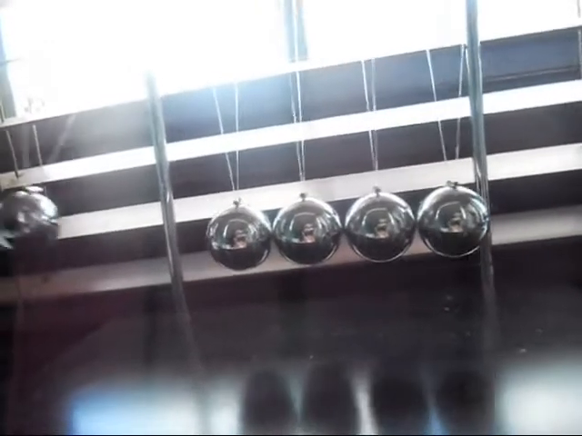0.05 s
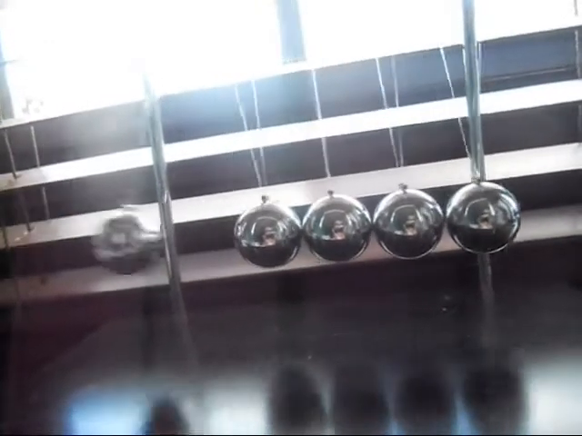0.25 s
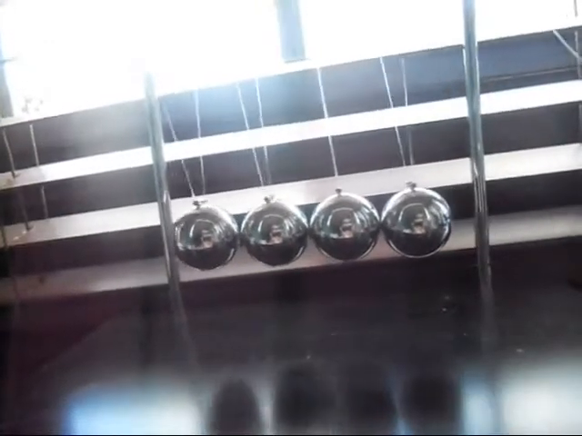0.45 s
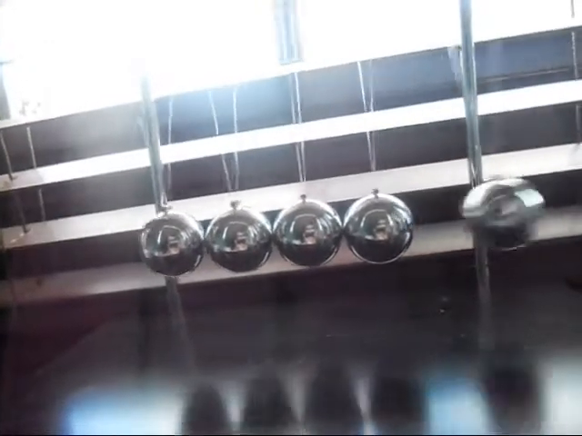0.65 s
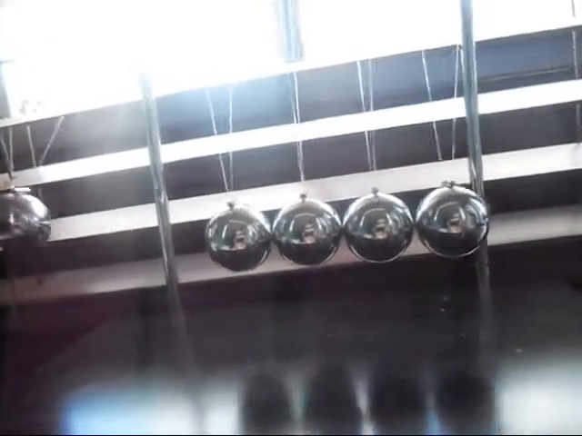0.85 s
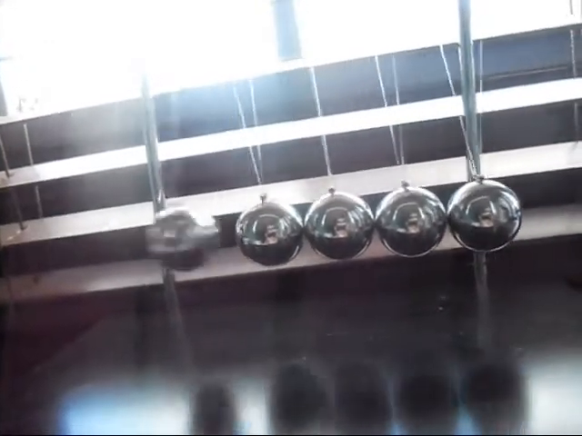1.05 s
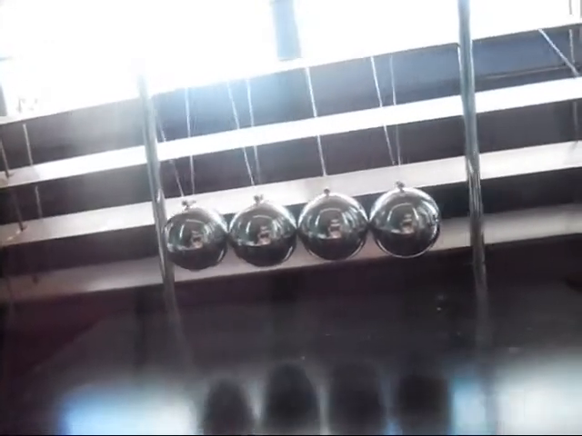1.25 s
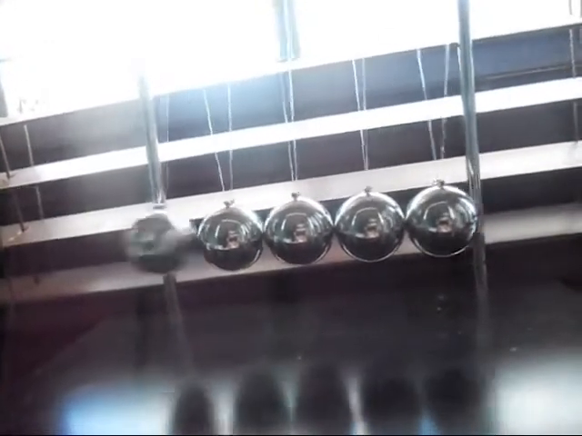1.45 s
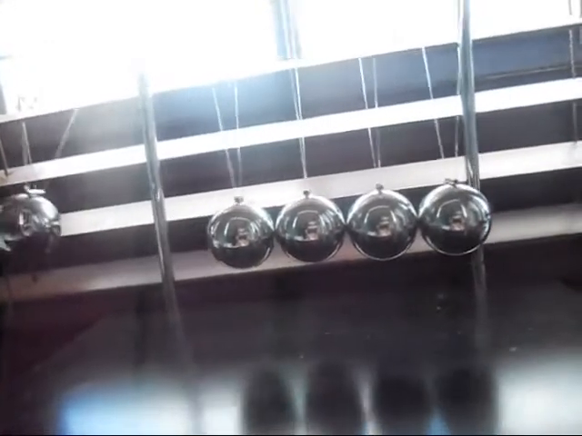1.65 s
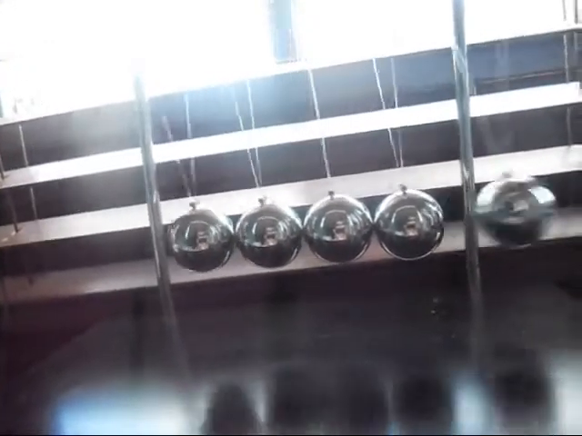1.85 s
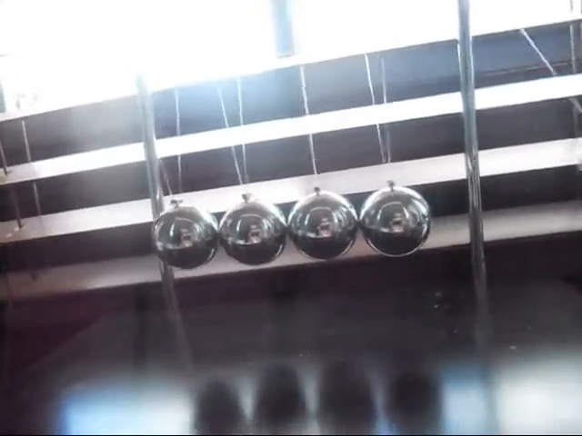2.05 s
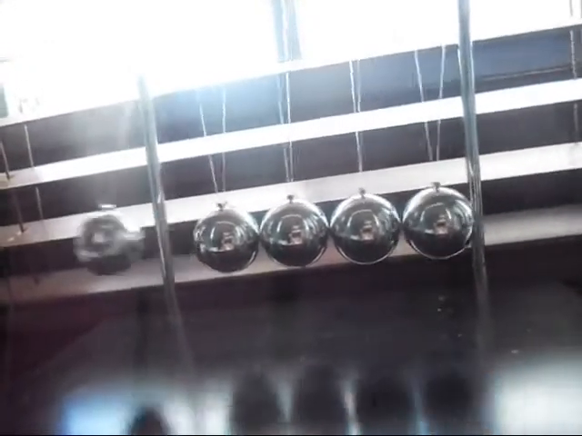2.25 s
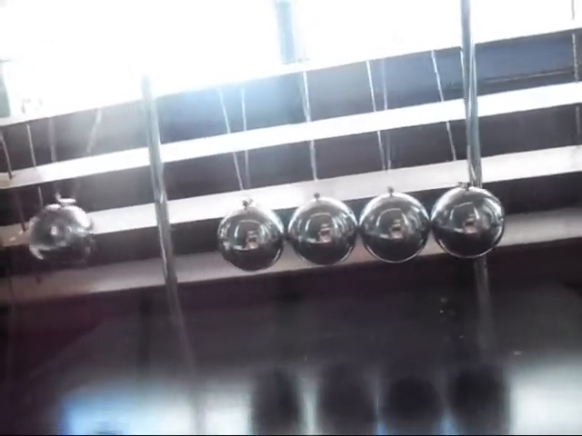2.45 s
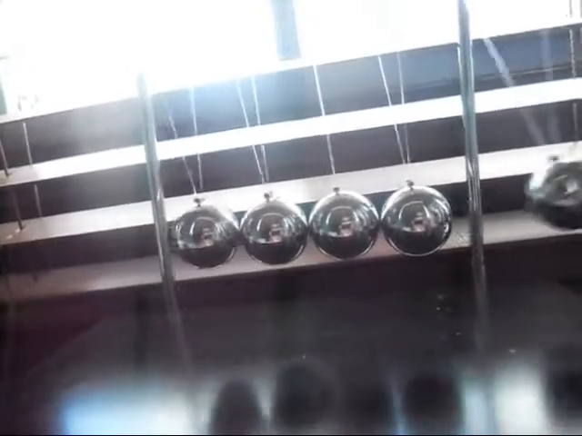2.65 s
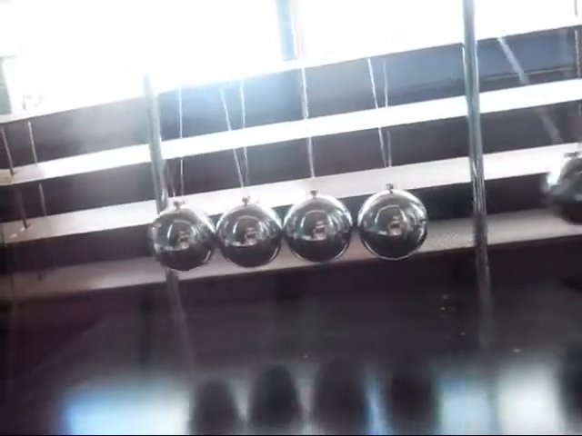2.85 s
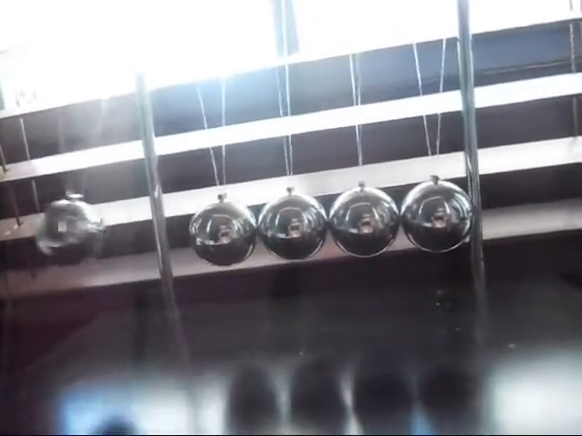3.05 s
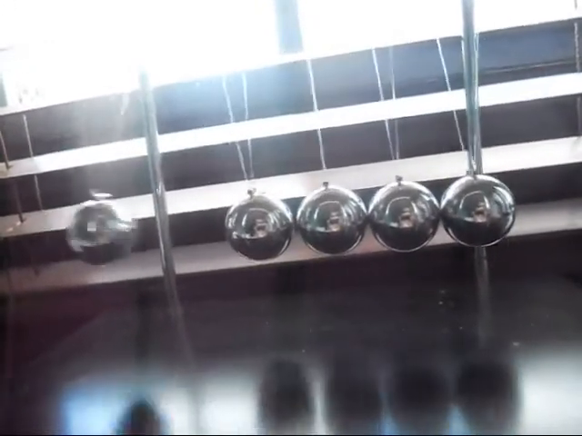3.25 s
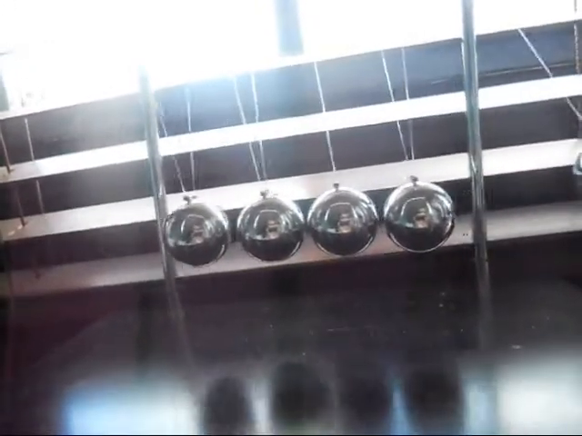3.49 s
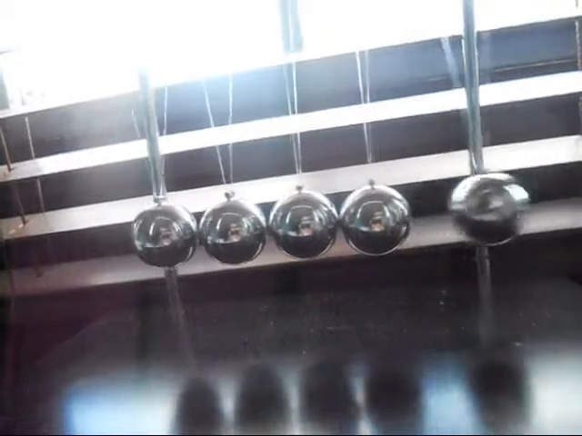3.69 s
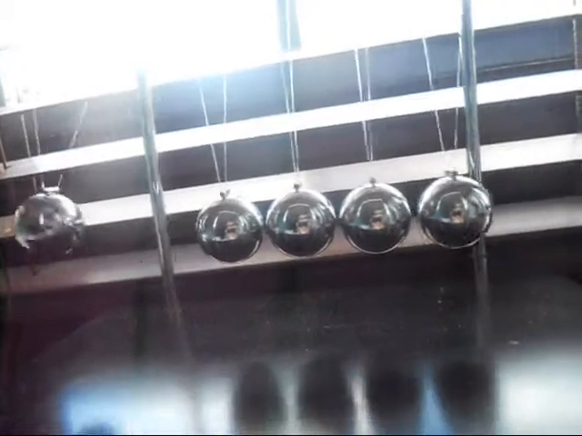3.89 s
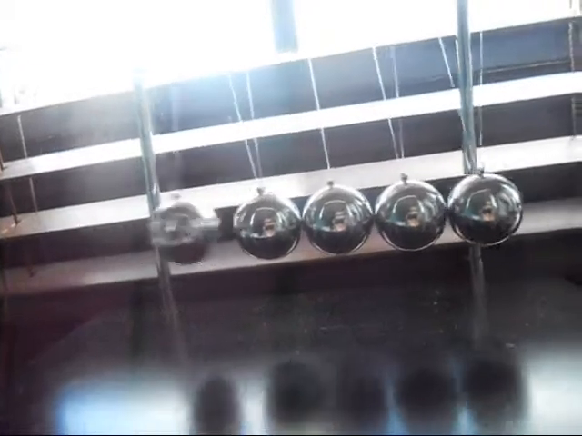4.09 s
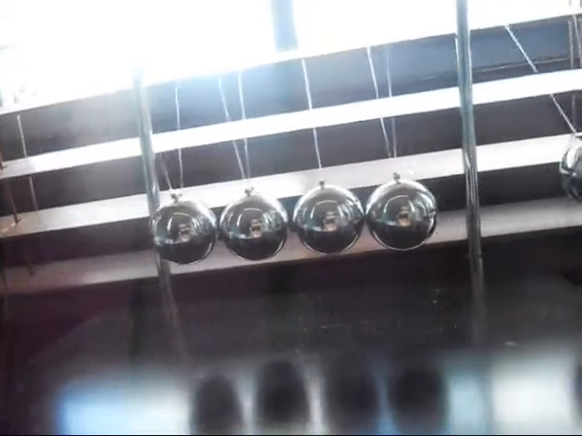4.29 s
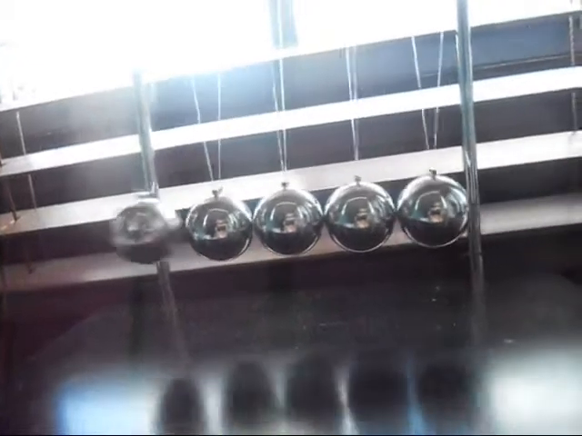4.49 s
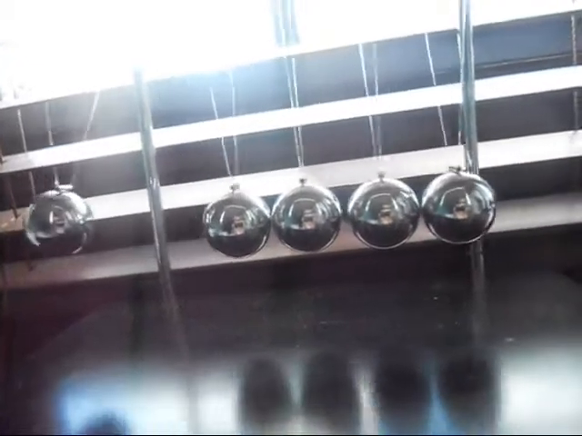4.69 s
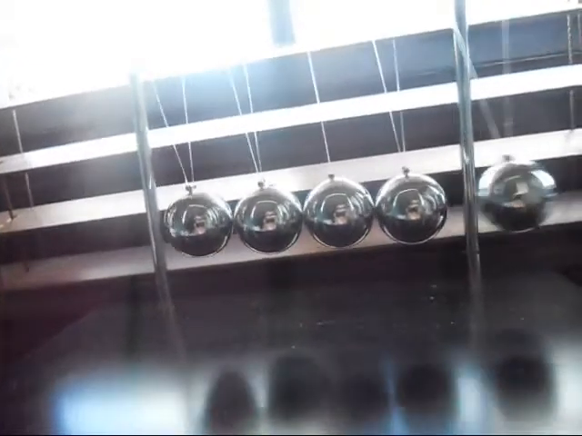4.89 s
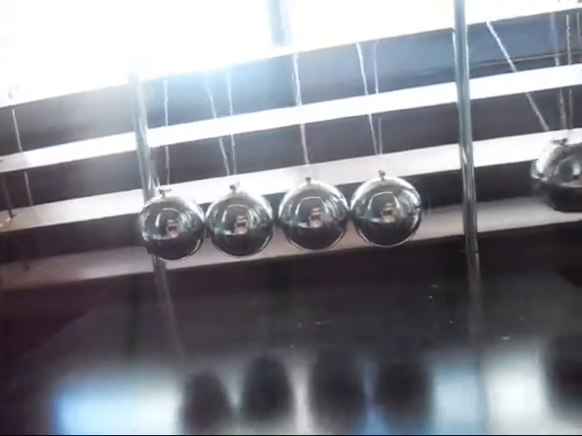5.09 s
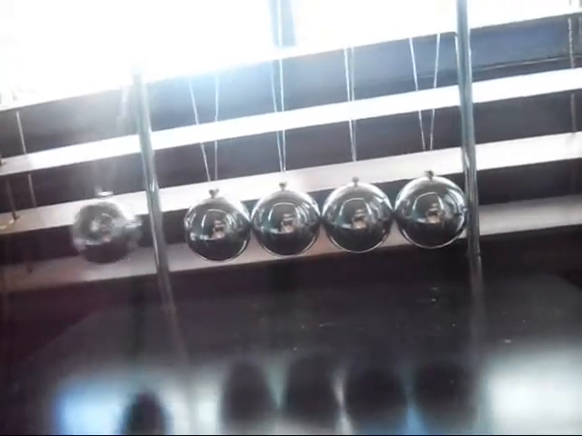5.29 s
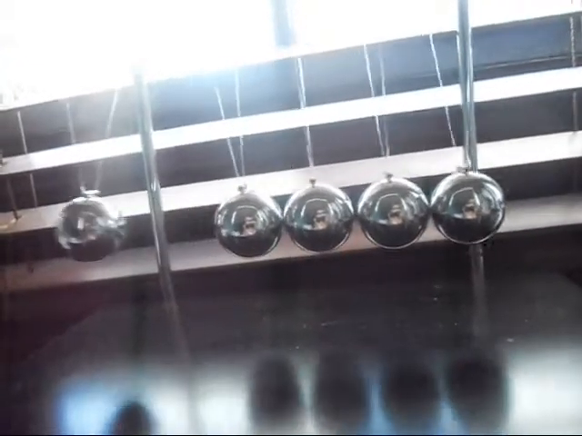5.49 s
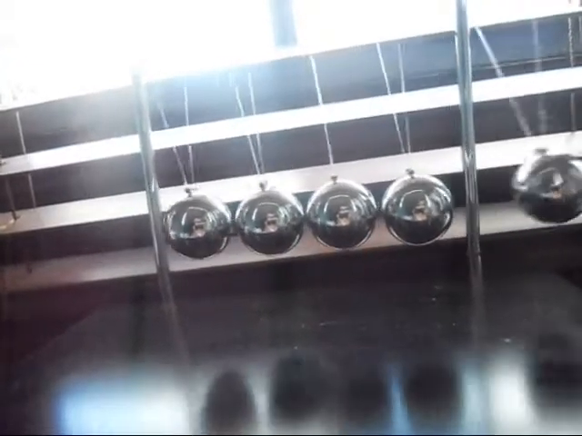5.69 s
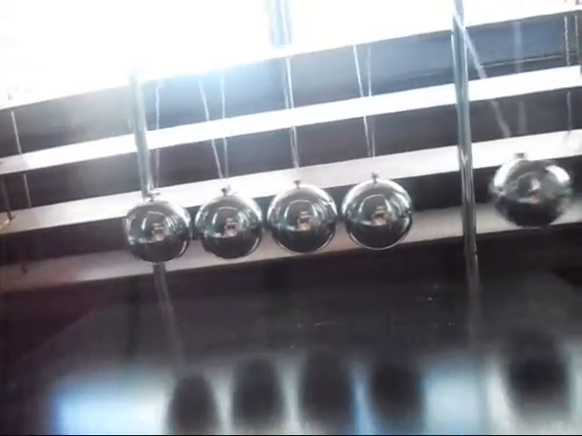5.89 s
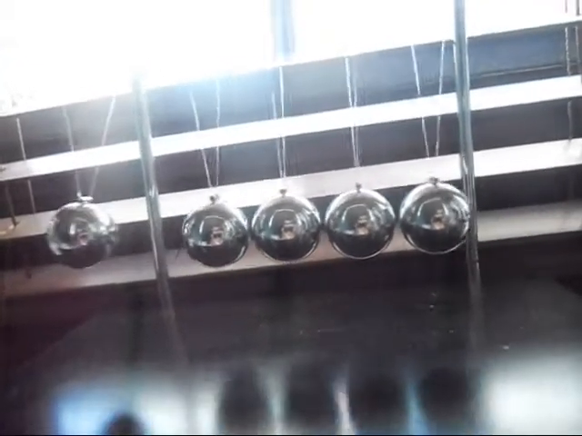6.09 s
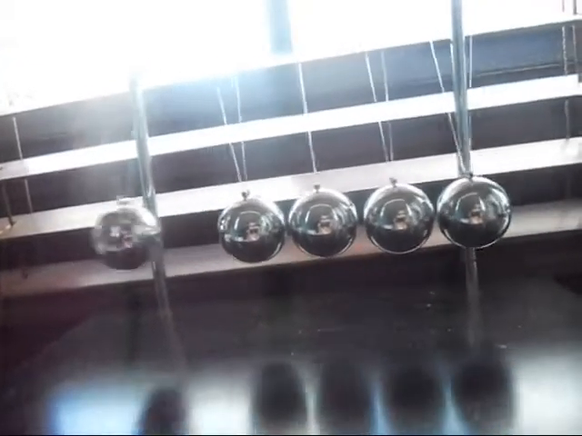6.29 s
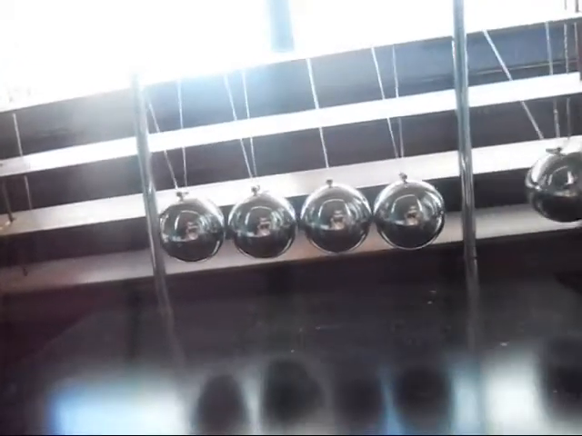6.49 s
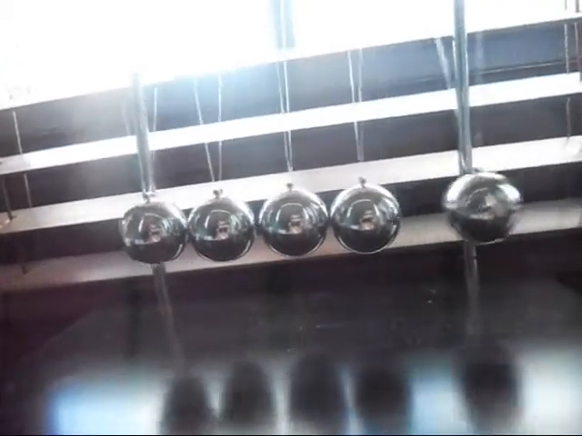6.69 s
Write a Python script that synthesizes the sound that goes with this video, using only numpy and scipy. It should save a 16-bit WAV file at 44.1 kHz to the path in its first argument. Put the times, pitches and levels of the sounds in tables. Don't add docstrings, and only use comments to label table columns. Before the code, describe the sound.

Five hanging steel balls clack sharply back and forth about every 0.38 seconds, close up, over rumbling hiss that suddenly drops near two seconds.

```python
import sys
import numpy as np
from scipy import signal
from scipy.fft import rfft, irfft
from scipy.io import wavfile

SR = 44100
rng = np.random.default_rng(int(sys.argv[2]) if len(sys.argv) > 2 else 0)


def master(y):
    cut = np.clip(np.atleast_2d(y).T, -1, 1)
    pcm = np.round(cut * 32767)
    wavfile.write(sys.argv[1], SR, pcm.astype(np.int16))


def undo_db(level):
    steps = np.asarray(level, float) / 20
    return 10 ** steps


N = 297234

# pitch_hz, level_db [dB per Hz]
RUMBLE_BEFORE_DROP = [(12, -23), (20, 1.5), (192, -2.5), (250, 0), (300, -2), (528, -4), (686, -1.5),
                      (840, -6), (929, -6), (1030, -4), (2500, -23), (3250, -38.5), (5500, -120)]
RUMBLE_AFTER_DROP = [(12, -33), (20, -3), (70, -6), (166, -8.5), (242, -2), (300, -5.5), (538, -8.5),
                     (585, -5), (818, -7.5), (908, -3.5), (1100, -7), (1400, -12.5), (2000, -23), (3000, -32),
                     (6600, -120)]
# pitch_hz, level_db [dB per Hz]
HISS_COLOUR = [(300, -7.5), (2000, -5.5), (4500, -8), (7180, -10), (9800, -10.5), (10500, -12.5),
               (11000, -28), (11600, -45), (22000, -120)]
# pitch_hz, width_hz, level_db [re rumble]
FAN_HUM = [(126, 6, -19), (248.9, 2.3, -13), (913, 33, -10.5)]
# time_s, level_db
LEVEL_BEFORE_DROP = [(0.0, -43), (1.61, -37), (2.03, -38.5), (2.08, -37.5), (2.15, -39)]
LEVEL_AFTER_DROP = [(2.16, -57.5), (3.3, -57.5), (3.5, -56.5), (3.6, -58), (3.72, -51), (3.87, -54),
                    (4.67, -53.5), (5.44, -55), (6.6, -55), (6.74, -51.5)]
# time_s, pitch_hz, level_db
MOTOR_COURSE = [
    (3.5, 108.2, -80),
    (3.8, 108, -67),
    (4.5, 108.2, -62.5),
    (5.1, 110, -65),
    (5.5, 112.3, -68.5),
    (6.1, 112.2, -71),
]
MOTOR_MULTIPLES = [1.5, -0.5, -5.5, -3]
# start_s, peak_db, pitch_hz, t60_s
CASING_TAPS = [(1.4528, -7.5, 306, 0.0083), (1.4532, -11, 718, .006), (1.4532, -14, 1380, 0.009),
               (1.4533, -25.5, 4500, 0.0036), (1.5726, 1.5, 1200, 0.0035), (1.5729, -13, 2940, 0.0043),
               (1.5749, -21, 237, 0.021), (1.9424, -8, 1500, 0.0037), (3.721, -35, 6000, .003),
               (4.116, -40, 6000, .003), (5.999, -44, 5000, .003), (6.375, -46.5, 5500, .003)]
# start_s, length_s, level_db, pitch_hz, width_hz
HAND_RUBS = [(0.743, 0.069, -31.5, 492, 380), (0.755, 0.05, -40, 3480, 2500), (.81, 0.062, -34.5, 197, 220),
             (.81, 0.021, -33, 600, 300), (1.1, 0.1, -39.5, 295, 392), (1.452, 0.094, -36, 800, 1370),
             (1.454, 0.085, -31, 119, 202), (1.571, .018, -26, 300, 603), (1.589, 0.1, -41, 4470, 6000),
             (1.939, 0.075, -33, 1210, 454), (1.94, 0.11, -38.5, 650, 400), (2.078, 0.079, -32, 127, 159),
             (3.631, 0.22, -53.5, 790, 603), (3.698, .08, -58, 60, 90), (4.406, 0.077, -43, 620, 417)]
# start_s, first_contact_peak_db, middle_lag_ms, last_lag_ms, last_level_db [re first]
BALL_BLOWS = [(0.3373, 0.5, 0.84, 1.6, -4.5), (0.7195, -5, 0.79, 2.7, -12), (1.1004, -4, 1.14, 2.7, -26),
              (1.4816, -4.5, 0.84, 2.13, -15), (1.862, -8, 0.86, 2.18, 5), (2.2413, -6, 0.96, 1.85, 1.5),
              (2.6205, -9.5, 1.2, 2.35, 7), (2.9992, -9.5, 0.5, 1.37, 3), (3.3786, -9, 1.32, 1.9, 1.5),
              (3.7561, -3.5, 1.86, 2.16, 5.5), (4.1353, -8.5, 0.49, 1.61, 10), (4.5129, -4, 1.6, 2, -1),
              (4.8906, -7, 1.2, 2.2, 4.5), (5.2681, -7.5, 1.65, 2.3, 2.5), (5.6465, -8, 1.02, 3.5, -6),
              (6.0223, -8.5, 2.8, 3.1, 0.5), (6.4007, -12, 1.27, 3.2, 4.5), (-0.045, -12, 1.1, 2.4, 0.5)]
# pitch_hz, level_db [dB per Hz]
CONTACT_COLOUR = [(350, -52.5), (600, -21.5), (1950, -19), (3550, -10.5), (5360, -5.5), (7010, -2.5),
                  (8110, -2.5), (9620, -0.5), (11000, -12), (14300, -24.5), (22000, -120)]
# pitch_hz, level_db [dB per Hz]
ROOM_TAIL_COLOUR = [(820, -50.5), (1400, -16.5), (2030, -17.5), (2700, -11.5), (3770, -10), (4850, -4.5),
                    (5240, -5), (7150, 1), (10000, -4.5), (11000, -15), (14300, -45.5), (22000, -120)]
# pitch_hz, t60_s
ROOM_DECAY = [(1500, 0.26), (3000, 0.34), (5000, 0.39), (7500, 0.27), (10500, 0.31)]

BACKGROUND_DROP_S = 2.1525
FRAME_HZ, FRAME_WIDTH_HZ = 6000, 2700


def rms_one(x):
    return x / np.sqrt(np.mean(x ** 2) + 1e-20)


def at_hz(points, hz):
    table_hz, values = np.array(points).T
    return np.interp(np.log(np.maximum(hz, 1)), np.log(table_hz), values)


def response(spectrum, size=8192):
    log_gain = at_hz(spectrum, np.arange(size // 2 + 1) * SR / size) * np.log(10) / 20
    cepstrum = irfft(log_gain)
    cepstrum[1:size // 2] *= 2
    cepstrum[size // 2 + 1:] = 0
    return irfft(np.exp(rfft(cepstrum)))


def noise(spectrum):
    gain = undo_db(at_hz(spectrum, np.arange(N // 2 + 1) * SR / N))
    return rms_one(irfft(gain * rfft(rng.standard_normal(N)), N))


def resonate(x, hz, width_hz):
    r = np.exp(-np.pi * width_hz / SR)
    zeros = np.array([1, 0, -1]) * (1 - r * r) / 2
    poles = [1, -2 * r * np.cos(2 * np.pi * hz / SR), r * r]
    return signal.lfilter(zeros, poles, x)


def delayed(x, lag_ms):
    return np.roll(x, round(lag_ms * SR / 1000))


def background():
    t = np.arange(N) / SR
    high = t < BACKGROUND_DROP_S
    high_db = np.interp(t, *np.transpose(LEVEL_BEFORE_DROP))
    low_db = np.interp(t, *np.transpose(LEVEL_AFTER_DROP))
    level_db = np.where(high, high_db, low_db)
    rumble = np.where(high, noise(RUMBLE_BEFORE_DROP), noise(RUMBLE_AFTER_DROP))
    for hz, width_hz, db in FAN_HUM:
        rumble += undo_db(db) * rms_one(resonate(rng.standard_normal(N), hz, width_hz))
    rumble_db = np.where(high, 0.5, -0.5)
    hiss_db = np.where(high, -3, -5)
    return undo_db(level_db) * (undo_db(rumble_db) * rumble + undo_db(hiss_db) * noise(HISS_COLOUR))


def motor():
    time_s, pitch_hz, level_db = np.transpose(MOTOR_COURSE)
    t = np.arange(N) / SR
    wobble_hz = 1.2 * rms_one(resonate(rng.standard_normal(N), 7.9, 11.0))
    phase = 2 * np.pi * np.cumsum(np.interp(t, time_s, pitch_hz) + wobble_hz) / SR
    tone = np.zeros(N)
    for multiple, db in enumerate(MOTOR_MULTIPLES, start=1):
        tone += undo_db(db) * np.sin(multiple * phase)
    return undo_db(np.interp(t, time_s, level_db)) * tone


def handling():
    out = np.zeros(N)
    t = np.arange(2000) / SR
    for start_s, db, hz, t60_s in CASING_TAPS:
        at = round(start_s * SR)
        onset = np.minimum(t * hz / 0.45, 1)
        out[at:at + len(t)] -= onset * undo_db(db - 60 * t / t60_s) * np.sin(2 * np.pi * hz * t)
    for start_s, length_s, db, hz, width_hz in HAND_RUBS:
        grain = undo_db(2.0 * rng.standard_normal(60)).repeat(100)
        slips = rng.standard_normal(6000) * grain
        rub = rms_one(resonate(resonate(slips, hz, width_hz * 1.3), hz, width_hz * 1.3))
        part = np.clip(np.arange(len(rub)) / SR / length_s, 0, 1)
        at = round(start_s * SR)
        out[at:at + len(rub)] += undo_db(db) * rub * np.sin(np.pi * part ** 0.67)
    return out


def room_tail(t):
    tail = np.zeros(len(t))
    edges_hz = 1000 * 2 ** np.arange(0, 4, 0.5)
    for low, high in zip(edges_hz, edges_hz[1:]):
        half_octave = signal.butter(2, [low, high], "band", fs=SR, output="sos")
        band = signal.sosfilt(half_octave, rng.standard_normal(len(t)))
        tail += band * undo_db(-60 * t / at_hz(ROOM_DECAY, np.sqrt(low * high)))
    colour = rms_one(response(ROOM_TAIL_COLOUR, size=1024)) / 32
    build_up = np.minimum(t / 0.0039, 1)
    return signal.fftconvolve(tail * build_up, colour)[:len(t)]


def spread(x, hits):
    share = 0.38
    pattern = share * hits / np.sqrt(np.sum(hits ** 2))
    pattern[np.argmax(np.abs(hits))] += 1 - share
    return signal.fftconvolve(x, pattern / np.sqrt(np.sum(pattern ** 2)))[:len(x)]


def contacts(first_db, middle_ms, last_ms, last_db):
    chatter_per_s, chatter_ms, chatter_db = 9000, 3.24, -8
    middle_peak_db = -12.5
    t = np.arange(300) / SR
    parting_ms = max(chatter_ms, last_ms + 0.22)
    touching = 1 / (1 + np.exp((t * 1000 - parting_ms) / 0.16))
    small = (rng.random(len(t)) < chatter_per_s / SR) * rng.standard_normal(len(t))
    out = undo_db(first_db + chatter_db) * np.clip(small, -1.5, 1.5) * touching
    for lag_ms, peak_db in (0, first_db), (middle_ms, middle_peak_db), (last_ms, first_db + last_db):
        out[round(lag_ms * SR / 1000)] = undo_db(peak_db)
    return out


def near_echoes(t):
    fade_out = 1 / (1 + np.exp(np.minimum((t * 1000 - 12.3) / 1.4, 50)))
    echoes = rng.standard_normal(len(t)) * (rng.random(len(t)) < 0.3)
    echoes = echoes + 0.61 * resonate(echoes, FRAME_HZ, FRAME_WIDTH_HZ)
    return undo_db(-19.5 - 60 * t / 0.051) * fade_out * echoes


def clacks():
    # lag in ms, share (sign = polarity); those of the base swap with the blow's direction
    desk_ms, desk_share = desk = (0.726, 0.22)
    base = [[(0.555, -0.1), (1.36, -0.14)], [(0.46, -0.12), (1.48, -0.16)]]
    room_db, room_follows = -34.5, 0.54
    body_filter = signal.butter(2, 4800, fs=SR, output="sos")
    click = response(CONTACT_COLOUR, size=1024)
    click = click / np.abs(signal.hilbert(click)).max()
    clicks = np.zeros(N + 2 * SR)
    room = np.zeros(N + 2 * SR)
    t = np.arange(SR // 2) / SR
    for k, (start_s, first_db, middle_ms, last_ms, last_db) in enumerate(BALL_BLOWS):
        at = SR + round(start_s * SR)
        hits = contacts(first_db, middle_ms, last_ms, last_db)
        strength = np.sqrt(np.sum(hits ** 2))
        tail = spread(room_tail(t), hits)
        tail = tail + desk_share * delayed(tail, desk_ms)
        direct = strength * near_echoes(t)
        direct[:len(hits)] += hits
        direct = direct + sum(share * delayed(direct, ms) for ms, share in [desk, *base[k % 2]])
        direct = direct + 0.08 * resonate(direct, FRAME_HZ, FRAME_WIDTH_HZ)
        body = signal.sosfiltfilt(body_filter, direct)
        clicks[at:at + len(t)] += direct + (undo_db(-0.65) - 1) * body
        room[at:at + len(t)] += strength ** room_follows * undo_db(room_db) * tail
    heard = signal.oaconvolve(clicks, click)[:len(room)] + room
    return heard[SR:SR + N]


def scene():
    return (background() + motor() + handling() + clacks())[None]


def band_limit(x):
    return signal.sosfilt(signal.butter(12, 16810, fs=SR, output="sos"), x)


def record(dry):
    half_rate = 1.3 * np.tanh(dry[:, ::2] / 1.3)
    held = half_rate.repeat(2, axis=1)[:, :N]
    steep = signal.ellip(10, 0.5, 62, 15760, fs=SR, output="sos")
    return band_limit(signal.sosfilt(steep, held))


dry = scene()
out = record(dry)
master(out)
```